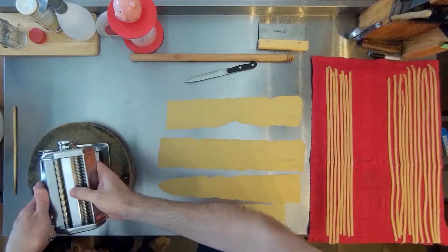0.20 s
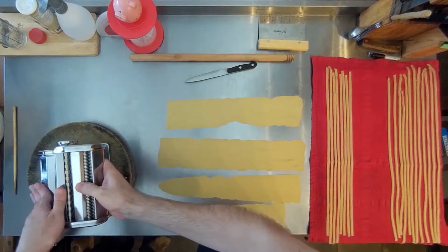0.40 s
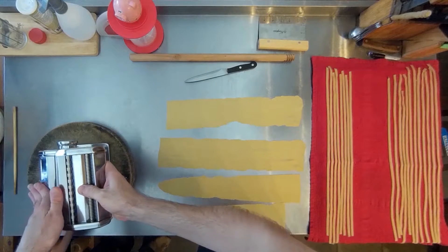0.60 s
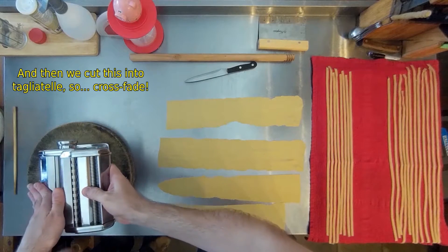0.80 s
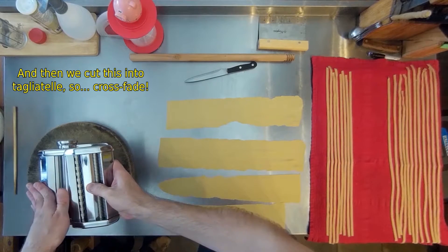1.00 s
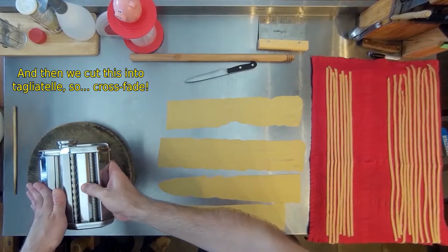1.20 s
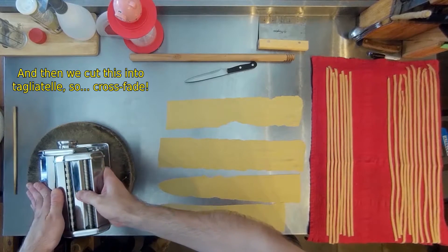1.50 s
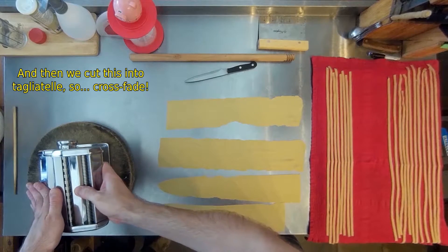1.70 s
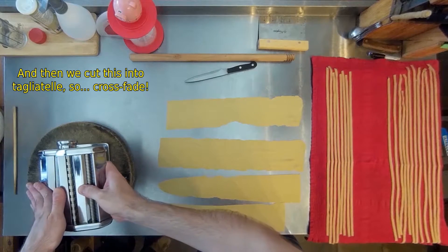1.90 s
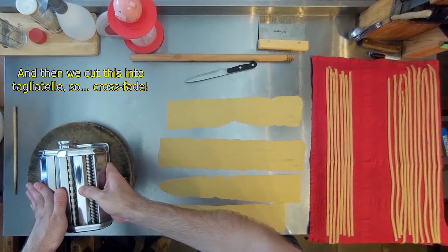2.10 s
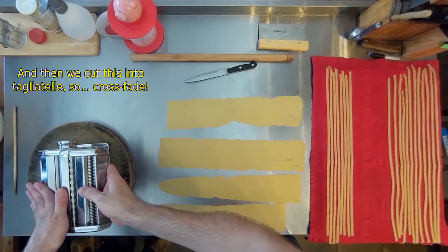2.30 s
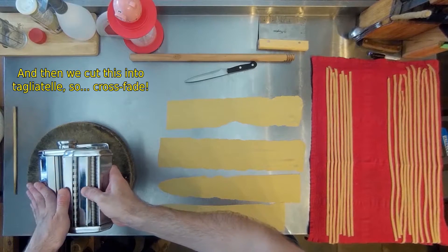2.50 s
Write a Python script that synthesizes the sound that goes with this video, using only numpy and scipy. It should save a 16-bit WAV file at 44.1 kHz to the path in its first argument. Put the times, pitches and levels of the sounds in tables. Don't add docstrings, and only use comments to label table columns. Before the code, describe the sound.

A metal pasta machine is rocked by hand on a worktop. A faint ring fades, then a gritty scrape at 0.2 s. Sharp hollow clanks strike at 0.45-0.6, cluster at 0.85 and knock near 1.0-1.1. After a lull around 1.3, the densest rattling comes at 1.45-1.7, then knocks at 1.9 and lighter taps until 2.5. Low thuds, mat rustle, short kitchen reverberation, soft room hush, slightly dull treble.

```python
import sys
import numpy as np
from scipy import signal
from scipy.io import wavfile
from scipy.ndimage import uniform_filter1d

SR = 44100
rng = np.random.default_rng(int(sys.argv[2]) if len(sys.argv) > 2 else 0)


def gain_from_db(level_db):
    decades = np.asarray(level_db, float) / 20
    return 10 ** decades


def materialize(psi):
    bounded = np.clip(np.atleast_2d(psi).T, -1, 1)
    quanta = np.round(bounded * 32767).astype(np.int16)
    wavfile.write(sys.argv[1], SR, quanta)


N = 114660


def rms_one(x):
    return x / np.sqrt(np.mean(x ** 2) + 1e-20)


def at_hz(points, hz):
    table = np.array(points)
    return np.interp(np.log(hz), np.log(table[:, 0]), table[:, 1])


def in_time(rows, **ends):
    return np.interp(np.arange(N) / SR, *np.transpose(rows), **ends)


def resonance(x, hz, width_hz):
    b, a = signal.iirpeak(hz, hz / width_hz, SR)
    return signal.lfilter(b, a, x)


def bands(shape, size):
    edges = 22 * 2 ** np.arange(0, 9.6, .5)
    white = rng.standard_normal((2, size))
    total = np.zeros(size)
    for k, (low, high) in enumerate(zip(edges, edges[1:])):
        band_pass = signal.butter(2, [low, high], "band", fs=SR, output="sos")
        total += shape(np.sqrt(low * high)) * signal.sosfilt(band_pass, white[k % 2])
    return rms_one(total)


def ring(clicks, hz, t60):
    r, w = gain_from_db(-60 / (t60 * SR)), 2 * np.pi * hz / SR
    return signal.lfilter([0, np.sin(w)], [1, -2 * r * np.cos(w), r * r], clicks + 1e-18)


RING_FLUTTER_DB = 6.5


def flutter_db(count):
    return rms_one(uniform_filter1d(rng.standard_normal((count, N)), size=500))


# pitch_hz, level_db [dB per Hz]
AIR_COLOUR = [(15, -38), (25, -8.5), (346, -4.5), (818, -15), (1030, -2), (1430, -15), (1540, -12.5),
              (6330, -33.5), (10500, -55.5), (13600, -89), (22000, -120)]


def kitchen_air():
    return gain_from_db(-59.5) * bands(lambda hz: gain_from_db(at_hz(AIR_COLOUR, hz)), size=N)


# pitch_hz, t60_s
ROOM_RING = [(60, 0.25), (400, 0.4), (1200, 0.31), (3000, 0.32), (8000, 0.44)]
ROOM_DB, ROOM_GAP_S = -3.5, 0.003


def kitchen_tail():
    t = np.arange(SR // 2) / SR
    opening = np.clip(t / ROOM_GAP_S - 1, 0, 1)
    tail = bands(lambda hz: gain_from_db(-60 * t / at_hz(ROOM_RING, hz)) * opening, size=len(t))
    return gain_from_db(ROOM_DB) * tail / np.sqrt(len(t))


# start_s, pitch_hz, level_db, t60_s
LIGHT_TOUCHES = [(0, 1513, -37, .2), (0, 2978, -57, .12), (0, 3295, -53, .15), (0, 4950, -56, .06),
                 (.055, 4950, -58, .15), (.07, 4300, -62, .1), (.075, 2476, -66, .2), (1.27, 2470, -56, .5),
                 (1.26, 2540, -54, .6), (1.27, 1510, -50, .2), (2.51, 1960, -54, .1), (2.3, 1020, -48, 1.2)]


def light_touches():
    flutter = gain_from_db(RING_FLUTTER_DB * flutter_db(len(LIGHT_TOUCHES)))
    out = np.zeros(N)
    for waver, (start, hz, db, t60) in zip(flutter, LIGHT_TOUCHES):
        click = gain_from_db(db) * (np.arange(N) == int(start * SR))
        out += waver * ring(click, hz, t60)
    return out


# start_s, level_db, pitch_hz
WEIGHT_PUSHES = [(0.15, -40.5, 55), (0.21, -26.5, 65), (0.185, -27, 155), (0.23, -35.5, 170),
                 (0.26, -30.5, 55), (0.35, -41, 45), (0.47, -26, 60), (1.03, -29.5, 58), (1.22, -30.5, 295),
                 (1.212, -38.5, 62), (2.1, -27, 200), (2.122, -52, 240), (1.43, -31, 56), (1.61, -27, 75),
                 (1.61, -21, 105), (1.68, -21, 120), (1.4, -30, 77), (2.3, -47, 115), (1.9, -21.5, 530)]
PUSH_CYCLES, PUSH_SOFT_S = 8.5, 0.0051


def pushes():
    t, out = np.arange(N) / SR, np.zeros(N)
    for start, db, hz in WEIGHT_PUSHES:
        age = t - start
        fade = gain_from_db(-60 * np.abs(age) * hz / PUSH_CYCLES)
        out += gain_from_db(db) * (age > 0) * np.sin(2 * np.pi * hz * age) * np.tanh(age / PUSH_SOFT_S) * fade
    return out


# peak_s, level_db, rise_s, fade_s
RUBS_AND_HISS = [(0.222, -30, 0.017, 0.043), (0.431, -42.5, 0.017, 0.034), (0.778, -42.5, .003, 0.024),
                 (1.023, -37, 0.0043, 0.039), (1.402, -67, 0.034, 0.027), (1.578, -41.5, 0.092, 0.093),
                 (2.17, -53, 0.0037, 0.026), (0.453, -32, .002, 0.05), (.546, -33.5, 0.0018, 0.026),
                 (.598, -44.5, .002, 0.036), (.838, -40, .002, 0.048), (1.098, -48.5, .002, 0.033),
                 (1.647, -41, .002, 0.037), (1.948, -49, 0.0022, 0.036), (2.209, -55, 0.0091, 0.032),
                 (0.071, -64, 0.037, 0.03), (2.514, -84, 0.013, 0.034)]
# pitch_hz, level_db [dB per Hz]
RUB_COLOUR = [(1500, -7.5), (3000, 10.5), (4600, 4), (5300, 8), (6000, 3.5), (9000, -16.5), (10500, -34)]
SQUEAL_HZ, SQUEAL_WIDTH_HZ, SQUEAL_DB = 5280, 250, 8


def rubs():
    t, swell = np.arange(N) / SR, np.zeros(N)
    for peak, db, rise, fade in RUBS_AND_HISS:
        swell += gain_from_db(db) * np.exp(-np.where(t < peak, ((peak - t) / rise) ** 2, (t - peak) / fade))
    grit = gain_from_db(1.66 * rms_one(uniform_filter1d(rng.standard_normal(N), size=60)))
    fibres = bands(lambda hz: gain_from_db(at_hz([(600, -65)] + RUB_COLOUR, hz)), size=N)
    rustle = swell * grit * fibres
    squealing = (t < .4) | (t > 2.16)
    return rustle + gain_from_db(SQUEAL_DB) * squealing * resonance(rustle, SQUEAL_HZ, SQUEAL_WIDTH_HZ)


# start_s, pitch_hz, level_db, t60_s
SINGING_MODES = [(0.453, 545, -36.5, 0.23), (.452, 2513, -31, 0.23), (.86, 2524, -31, .2),
                 (.88, 715, -39, .5), (.87, 544.4, -38, 0.31), (1.031, 2514, -35, 0.3),
                 (1.097, 2466, -30.5, .12), (1.57, 2500, -35, .2), (1.648, 2356, -23.5, 0.082),
                 (1.898, 1205, -19.5, 0.13), (1.9, 601, -40.5, 0.27), (2.092, 2546, -39, 0.18)]
SING_SOFT_S = .004


def singing():
    t, out = np.arange(N) / SR, np.zeros(N)
    waver_db = RING_FLUTTER_DB / 2 * flutter_db(len(SINGING_MODES))
    for (start, hz, db, t60), waver in zip(SINGING_MODES, waver_db):
        age = t - start
        level = gain_from_db(db + waver - 60 * np.abs(age) / t60)
        out += level * (age > 0) * np.tanh(age / SING_SOFT_S) * np.sin(2 * np.pi * hz * t)
    return out


def grains(per_s, level_db, bright_db, thud_db):
    born = rng.random(N) < per_s / SR
    size_db = 4.48 * np.minimum(rng.exponential(1, N), 4.0)
    at = np.flatnonzero(born & (level_db > -90))
    same = np.ones(len(at))
    return np.column_stack([at / SR, level_db[at] + size_db[at], bright_db * same, thud_db * same, 0 * same])


# time_s, level_db
SLIDE_LEVEL = [
    (.16, -62),
    (.18, -35.5),
    (.19, -31.5),
    (.202, -24.5),
    (.225, -20),
    (.26, -34.5),
    (.3, -41),
]


def slide():
    level_db = in_time(SLIDE_LEVEL, left=-200, right=-200) - 20.5
    return grains(per_s=1500, level_db=level_db, bright_db=-2.5, thud_db=-51)


# time_s, level_db
HAND_EFFORT = [(0.0, -60), (0.22, -23), (0.35, -30.5), (0.42, -26.5), (0.51, -25), (0.65, -25),
               (1.0, -18.5), (1.17, -23), (1.26, -31.5), (1.4, -50.5), (1.48, -36), (1.61, -13),
               (1.78, -20), (2.1, -33), (2.15, -38), (2.28, -33), (2.45, -81.5), (2.6, -59)]


def chatter():
    level_db = in_time(HAND_EFFORT) - 29.5
    return grains(per_s=480, level_db=level_db, bright_db=-14.5, thud_db=-18)


EARLIER_AND_SOFTER = [.001, 6.0, 0, 0, 0]

# start_s, peak_db, brightness_db, side_wall_db
MORE_KNOCKS = [(.174, -34, -40, -7), (.187, -28, -20, -10), (.213, -21, -16, -8), (.223, -16, -19, -2),
               (.234, -20, -15, -7), (.249, -23, -19, 1), (.491, -16, -15, -2), (.556, -16, -19, 5),
               (.632, -19, -23, 10.5), (.674, -22, -23, 8), (.792, -26, -25, 5.5),
               (.924, -25, -15.5, 1.5), (.995, -27, -24, 3), (1.043, -18, -19, 1),
               (1.268, -34.5, -14.5, 4), (1.497, -13.5, -22, -7), (1.559, -13.5, -25, 3.5),
               (1.582, -9, -21, -8), (1.604, -11, -24, -5), (1.618, -18.5, -20, -1),
               (1.661, -16, -15.5, 3.5), (1.675, -16.5, -19, 12), (1.687, -20.5, -20, -1),
               (1.829, -22, -24.5, -5), (1.841, -21, -24.5, -8), (1.913, -21, -26, -7),
               (1.968, -19.5, -18.5, 2), (2.112, -26, -22, 9), (2.165, -39, -21, 11),
               (2.184, -27.5, -26, 7), (2.203, -24.5, -5, 3), (2.233, -28, -17, 1),
               (2.246, -28.5, -17.5, -2), (2.507, -40, -22, -2), (2.521, -34.5, -21, 7)]
MORE_KNOCKS_THUD_DB = -31


def more_knocks():
    return np.insert(np.array(MORE_KNOCKS), [3], MORE_KNOCKS_THUD_DB, axis=1) - EARLIER_AND_SOFTER


# start_s, peak_db, brightness_db, thud_db, side_wall_db
PART_KNOCKS = [(0.201, -12.5, -15, -27.5, -5), (0.45, 1.5, -10.5, -29, -0.5),
               (0.544, -2.5, -18.5, -25.5, 1), (0.596, -1, -13, -35.5, 4), (0.609, -5.5, -33, -24.5, 5.5),
               (0.78, -20.5, -36, -23, 4), (0.835, -4.5, -15, -26, -3.5), (0.862, -3.5, -21, -29.5, -1.5),
               (0.874, -7, -10, -18.5, 0.5), (0.898, -9.5, -20, -48, -1), (0.911, -12.5, -19, -50, -2),
               (1.031, -9.5, -21.5, -33, 0.5), (1.097, -12, -9.5, -19.5, 2), (1.349, -31, -25, -21, 8),
               (1.419, -24, -12, -12, 1.5), (1.441, -11, -18.5, -18, -2), (1.484, -2.5, -20, -25, -4),
               (1.539, -4.5, -16, -25, -1.5), (1.57, -3, -15, -23, -10.5), (1.625, -11.5, -26, -25, -9),
               (1.646, -5.5, -9.5, -23, 2), (1.784, -12.5, -12, -21.5, -5),
               (1.898, -7.5, -20, -28.5, -14.5), (1.947, -4, -14.5, -31.5, -5), (2.037, -22, -20, -41, 0),
               (2.091, -12, -23.5, -35, 5.5), (2.171, -27.5, -17, -33, 4.5), (2.195, -14, -15, -26, -0.5),
               (2.259, -22, -20.5, -33, -7), (2.513, -35, -21, -20, 8)]


def knocks():
    return np.array(PART_KNOCKS) - EARLIER_AND_SOFTER


# pitch_hz, level_db
PLATE_LEVEL = [(470, -50), (800, -4), (1090, 3.5), (1370, -6.5), (1630, -7), (2200, -12), (2560, -8),
               (6900, -33.5), (10500, -64), (13600, -90.5), (22000, -120)]
# pitch_hz, t60_s
PLATE_RING = [(800, 0.055), (3000, 0.044), (10000, 0.084)]
PLATES_DB = -12


def plate_modes():
    hz = np.geomspace(850, 11000, num=130) * rng.uniform(.99, 1.01, size=130)
    level_db = at_hz(PLATE_LEVEL, hz) + PLATES_DB + 5 * np.log10(hz / 1000)
    return np.column_stack([hz, level_db, at_hz(PLATE_RING, hz)])


CONTACT_S, STRIKE_SPREAD_DB = .0015, 2


def strike(contacts, modes, colour_db):
    out, at = np.zeros(N), (contacts[:, 0] * SR).astype(int)
    chance = rng.standard_normal((len(contacts), len(modes), 3))
    for k, (hz, level_db, t60) in enumerate(modes):
        strength, sign, lateness = chance[:, k].T
        lag = (lateness ** 2 * CONTACT_S * SR).astype(int)
        hit_db = contacts[:, 1] + level_db + colour_db(hz) + STRIKE_SPREAD_DB * strength
        clicks = np.zeros(N + SR)
        clicks[at + lag] = gain_from_db(hit_db) * np.sign(sign)
        out += ring(clicks[:N], hz, t60)
    return out


# pitch_hz, level_db, t60_s
STEEL_MODES = [(896, -15.5, 0.16), (1023.4, -9, 0.056), (1066, -2, 0.021), (1097, -13, 0.1),
               (1162, -17.5, 0.12), (1203, -6.5, 0.086), (1577, -3.5, 0.02), (1613, -8, 0.054),
               (1970, -28.5, 0.021), (2150, -25, 0.07), (2516, -14, 0.048),
               (1017, -27, 1), (1210, -26.5, 0.21), (2475, -18.5, 0.13), (2950, -26.5, 0.067),
                (3265, -17.5, 0.018), (4313, -27.5, 0.035), (4500, -26, 0.04), (6240, -34, 0.03)]
# pitch_hz, level_db, t60_s
WORKTOP_MODES = [(35, -16, 0.06), (62.5, 0.5, 0.11), (107.8, -2, 0.17), (156.7, -3, 0.16),
                 (203.2, -0.5, 0.11), (236.8, -1.5, 0.14), (325, -10.5, 0.06)]
# pitch_hz, level_db, t60_s
BASE_MODES = [(422, -38.5, 0.093), (547.8, -29.5, 0.14), (601, -29, 0.21), (777.3, -28, 0.16)]
BRIGHT_FROM_HZ, BRIGHT_OCTAVES, USUAL_BRIGHT_DB = 1236, 1.44, -13.5
SIDE_WALL_HZ, SIDE_WALL_OCTAVES = 1546, .2
CASING_LOW_CUT_HZ, THUD_DB = 1104, 1.5


def machine(contacts, plates):
    _, _, bright_db, thud_db, wall_db = contacts.T

    def colour(hz):
        tilt = np.clip(np.log2(hz / BRIGHT_FROM_HZ) / BRIGHT_OCTAVES, 0, 1)
        wall = np.exp(-(np.log2(hz / SIDE_WALL_HZ) / SIDE_WALL_OCTAVES) ** 2)
        return (bright_db - USUAL_BRIGHT_DB) * tilt + wall_db * wall

    steel = strike(contacts, np.vstack([STEEL_MODES, plates]), colour)
    low_cut = signal.butter(4, CASING_LOW_CUT_HZ, "high", fs=SR, output="sos")
    thud = strike(contacts, WORKTOP_MODES, lambda hz: thud_db + THUD_DB)
    return signal.sosfilt(low_cut, steel) + thud + strike(contacts, BASE_MODES, colour)


VALLEY_HZ, VALLEY_WIDTH_HZ, VALLEY_DEPTH = 672, 97, .7


def scene():
    plates = plate_modes()
    small_contacts, sliding_contacts = chatter(), slide()
    near = machine(knocks(), plates)
    near += machine(small_contacts, plates) + machine(sliding_contacts, plates)
    near += light_touches() + pushes() + rubs()
    tail, air = kitchen_tail(), kitchen_air()
    near += machine(more_knocks(), plates) + singing()
    near = near - VALLEY_DEPTH * resonance(near, VALLEY_HZ, VALLEY_WIDTH_HZ)
    return (near + signal.fftconvolve(near, tail)[:N] + air)[None]


def top_cut(x):
    return signal.sosfilt(signal.butter(12, 11120, fs=SR, output="sos"), x)


NOTCH_HZ, NOTCH_WIDTH_HZ, NOTCH_DEPTH = 8000, 900, .92
MIC_ROLL_HZ, CUTOFF_HZ = 9030, 11100
TOP, KNEE = .52, 6


def record(dry):
    mix = dry - NOTCH_DEPTH * resonance(dry, NOTCH_HZ, NOTCH_WIDTH_HZ)
    mix = signal.sosfilt(signal.butter(4, MIC_ROLL_HZ, fs=SR, output="sos"), mix)
    mix = mix / (1 + np.abs(mix / TOP) ** KNEE) ** (1 / KNEE)
    mix = signal.sosfilt(signal.cheby2(12, 36, CUTOFF_HZ, fs=SR, output="sos"), mix)
    return top_cut(mix)


dry = scene()
out = record(dry)
materialize(out)
```